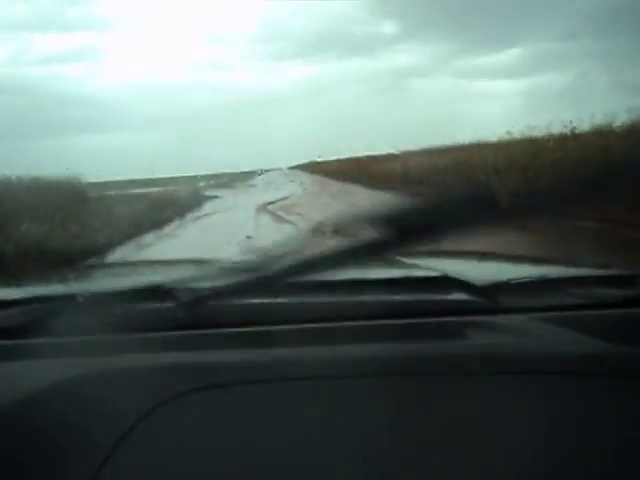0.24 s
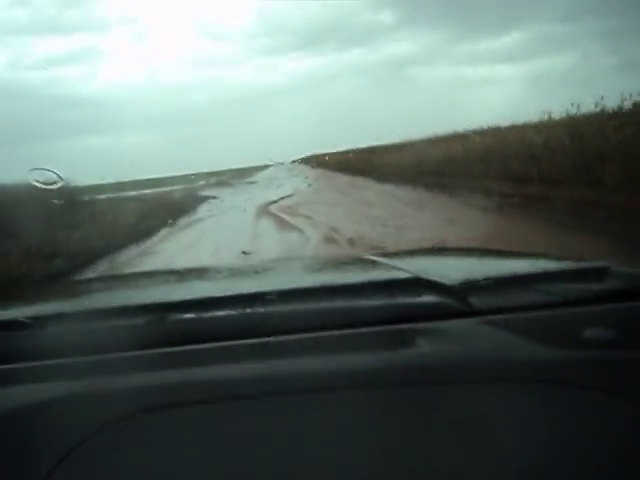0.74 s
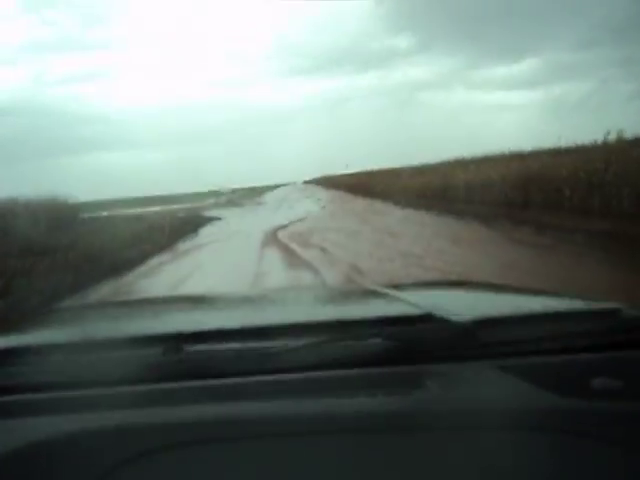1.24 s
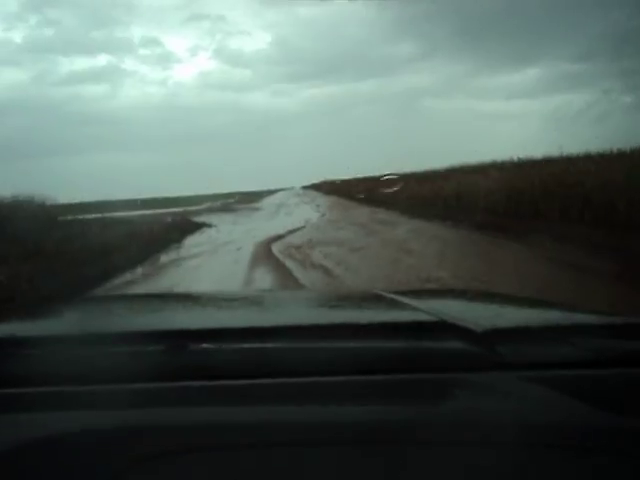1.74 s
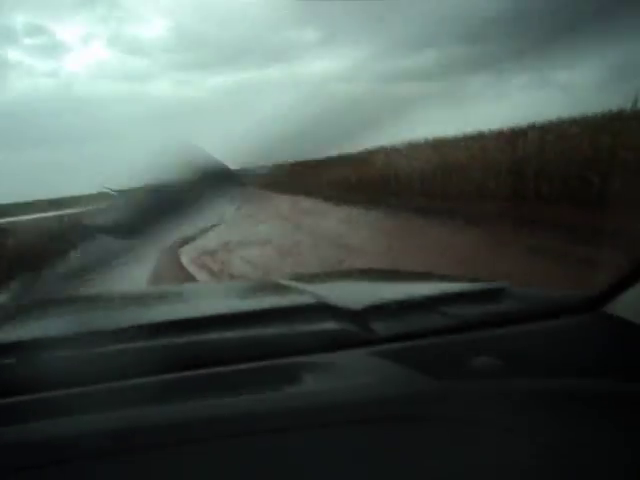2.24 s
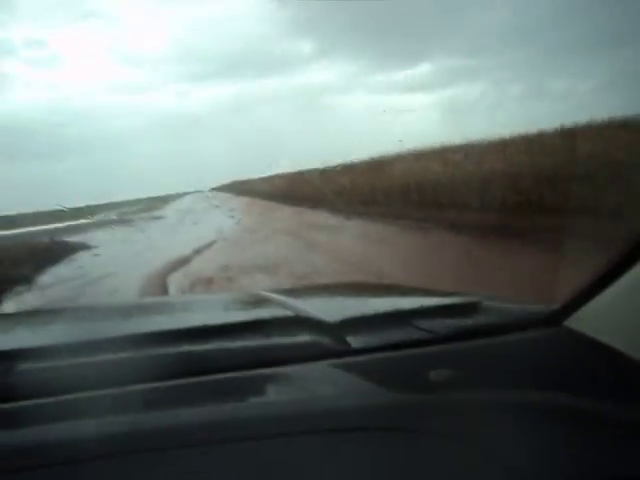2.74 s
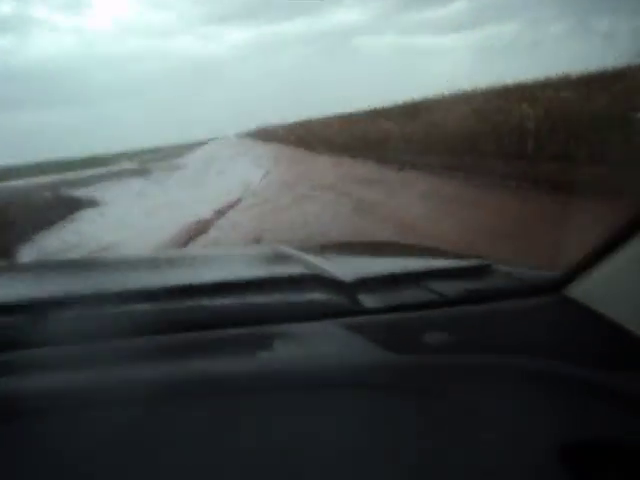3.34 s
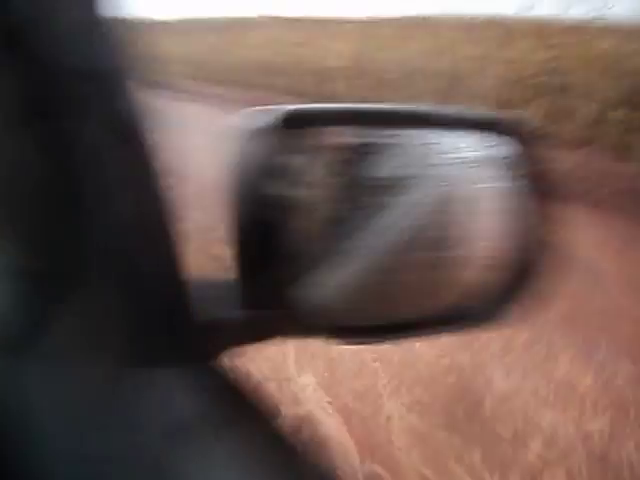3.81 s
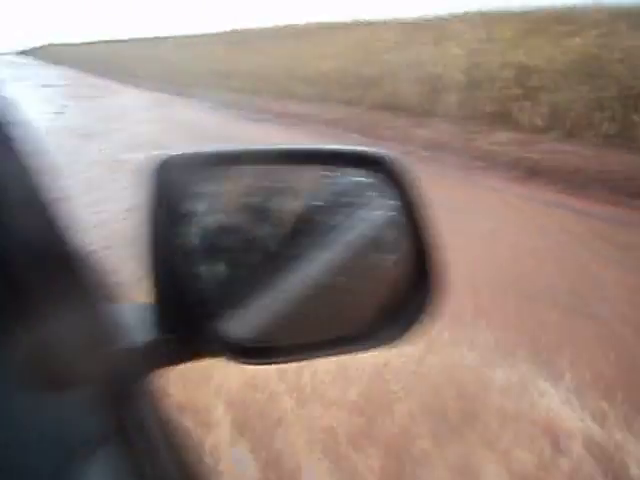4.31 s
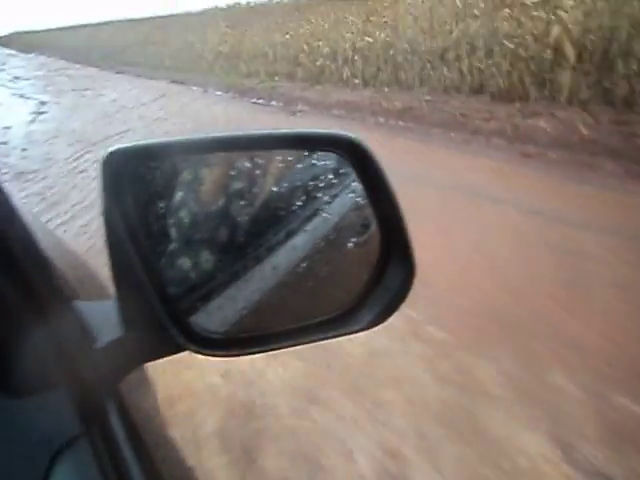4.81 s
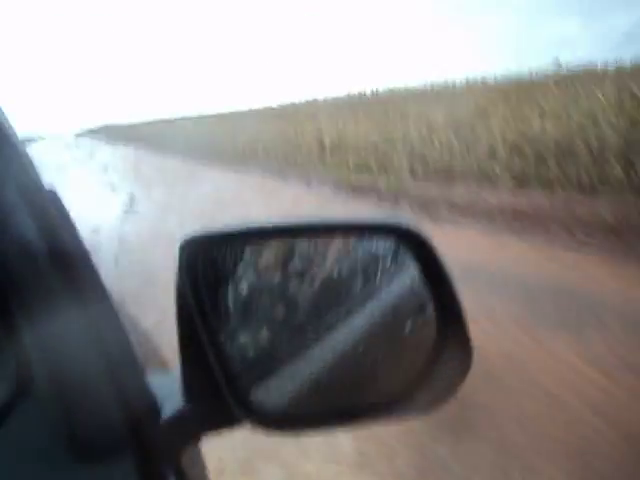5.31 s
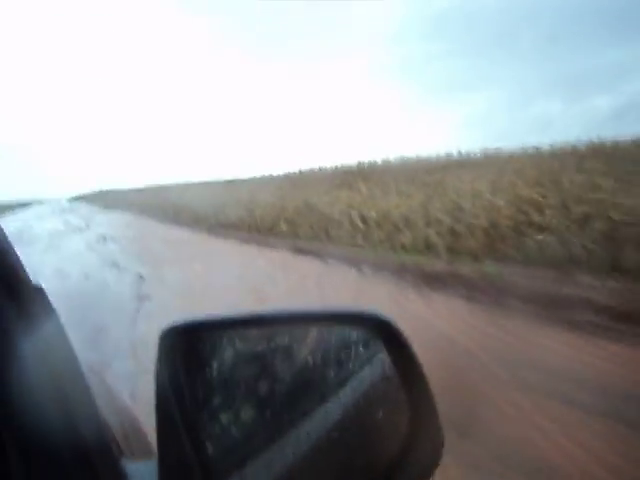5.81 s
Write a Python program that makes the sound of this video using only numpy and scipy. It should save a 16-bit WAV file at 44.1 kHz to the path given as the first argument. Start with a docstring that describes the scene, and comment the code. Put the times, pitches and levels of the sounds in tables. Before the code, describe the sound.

From 0 s, a close, muffled car interior: a low engine drone wavering around 40 Hz, floor boom and dull wash of road and water. At about 0.17, 1.34 and 2.53 s the wipers turn with a hard thud, a brief loose rattle and a second knock some 0.07 s later, then a short sinking motor whine and rubbery drag. Softer bumps mark the opposite turns near 0.7, 1.9 and 3.05 s. Small plastic clicks come at 1.7 and 2.3 s; strong ones at 3.17, 3.39 and, loudest, 3.69 s, over a weaker wiper turn, with the automatic level ducking afterwards. From 3 s spray fades in; by 4 s the cabin recedes behind fine droplet hiss and tyre splashing. A bright knock at 4.11 s, a soft thump at 4.43 s, then uneven low wind puffs buffet the microphone, thickest around 4.8-5.1 s and again near 5.9-6 s. Treble is limited, the sound mono and rough.

```python
"""Inside a car rolling slowly through flood water: wavering engine orders drone over shaped noise for the cabin
rumble and the muffled spray. Wipers thud at each turn as blows ring a panel; their joints rattle and motor whines.
A hand-held camera creaks as its shell rings, then swings to the open side window, where droplet noise hisses
and gusts of low noise buffet the microphone. Its gain control ducks everything after the sharpest ticks."""
import sys
import numpy as np
from scipy import signal
from scipy.io import wavfile
from scipy.ndimage import uniform_filter1d

SR = 44100
rng = np.random.default_rng(int(sys.argv[2]) if len(sys.argv) > 2 else 0)


def voltage_ratio(level):
    """Linear amplitude factor for a level in decibels (scalar or array-like)."""
    return 10 ** (np.asarray(level, float) / 20)


def master(y):
    """Save y as 16-bit WAV."""
    cut = np.clip(np.atleast_2d(y).T, -1, 1)
    pcm = np.round(cut * 32767)  # scale
    wavfile.write(sys.argv[1], SR, pcm.astype(np.int16))


N = 267244
T = np.arange(N) / SR

# Wiper cycles. Each row: time of the lower turn in seconds, strength in dB,
# slack in seconds until the arm catches.
SWEEPS = [(0.165, -1.5, 0.072), (1.344, -2, 0.068), (2.526, -2, 0.07), (3.704, -10, 0.067)]
# Modes of the panel under the screen. Each row: frequency in Hz, relative level in dB, nominal t60 in seconds.
COWL = [(83, -7, 0.23), (121.5, 2, 0.1), (156, -1, 0.061), (200.7, -3.5, 0.079), (268, -6.5, 0.081),
        (344, -1, 0.047), (455, -14.5, 0.15), (539, -10.5, 0.072), (660, -5, 0.067), (851, -17.5, 0.095),
        (973, -17, 0.041), (1076, -16.5, 0.026), (1380, -25.5, 0.0073), (2100, -20, 0.018),
        (2800, -21, 0.025), (3880, -23.5, 0.0094)]


def evened(x):
    """Scales to rms 1."""
    return x / np.sqrt(np.mean(x ** 2) + 1e-20)


def add(mix, s, sound):
    """Mixes a sound in at time s."""
    part = mix[round(s * SR):][:len(sound)]
    part += sound[:len(part)]


def band_passed(x, low_hz, high_hz):
    """Keeps what lies between two frequencies."""
    return signal.sosfilt(signal.butter(2, [low_hz, high_hz], "band", fs=SR, output="sos"), x)


def wander(hz):
    """Slow chance of rms 1, up to about hz."""
    low_pass = signal.butter(2, hz, fs=SR, output="sos")
    return evened(signal.sosfilt(low_pass, rng.standard_normal(N)))


def ring(hz, db, t60, rise):
    """One dying mode after a blow; rise is the time constant of its onset in seconds."""
    t = np.arange(SR // 4) / SR
    return voltage_ratio(db - 60 * t / t60) * (1 - np.exp(-t / rise)) * np.sin(2 * np.pi * hz * t)


def noise(spectrum, patchy_db, flicker_db, size):
    """Noise of rms 1 from random short-time spectra, with drifting patches and a flicker shared by all bands."""
    frames, bin_hz = 4 * N // size + 5, np.fft.rfftfreq(size, 1 / SR)
    real, imaginary, patches = rng.standard_normal((frames, len(bin_hz), 3)).T
    patches = uniform_filter1d(patches, size=size // 100, axis=0)
    patches = evened(uniform_filter1d(patches, size=8, axis=1))
    flicker = evened(uniform_filter1d(rng.standard_normal(frames), size=3))
    hz, db = np.transpose(spectrum)
    colour_db = np.interp(np.log(bin_hz + 1), np.log(hz + 1), db)[:, None]
    spectra = (real + 1j * imaginary) * voltage_ratio(colour_db + patchy_db * patches + flicker_db * flicker)
    return evened(signal.istft(spectra, nperseg=size, noverlap=3 * size // 4)[1][:N])


def car():
    """Engine orders waver in level over the boom of the floor and the wash of road and water."""
    # The car heard from the seat. Each row: time in seconds, engine drone level in dB, cabin wash level in dB.
    cabin = [(0, -35, -30.5), (0.797, -37, -29.5), (1.401, -37.5, -30), (1.947, -31.5, -29),
             (2.501, -44, -28.5), (3.1, -32, -28.5), (3.598, -37.5, -27.5), (4.002, -45, -41),
             (4.404, -39.5, -43), (6.1, -37, -29)]
    # Engine orders. Each row: multiple of the firing rate, relative level in dB.
    orders = [(1, 1), (2, -7.5), (3, -17.5), (5, -10.5)]
    # Road and water through the body. Each row: frequency in Hz, relative level in dB per Hz.
    wash_colour = [(88, -43.5), (150, -5), (189, 2.5), (269, -1.5), (324, -8), (667, -7), (840, -6),
                   (921, -12), (1460, -18.5), (2080, -14.5), (3790, -19.5), (5000, -27.5), (5920, -62),
                   (7700, -74), (13000, -120)]
    # Boom of the floor. Each row: frequency in Hz, relative level in dB per Hz.
    boom_colour = [(10, -16), (22, 6), (45, -6), (80, -1), (150, -13), (250, -30.5), (400, -40.5)]
    firing_hz, uneven = 38.47, 0.0501  # uneven: rms share by which the engine speed wavers

    s, drone_db, wash_db = np.transpose(cabin)
    drone_gain = np.sqrt(2) * voltage_ratio(np.interp(T, s, drone_db))
    wash_gain = voltage_ratio(np.interp(T, s, wash_db))

    turns = np.cumsum(firing_hz * (1 + uneven * wander(3.884))) / SR
    drone = np.zeros(N)
    for multiple, db in orders:
        drone += voltage_ratio(db + 1.5 * wander(2.2)) * np.sin(2 * np.pi * (multiple * turns + rng.random()))

    wash = noise(wash_colour, patchy_db=1.5, flicker_db=1.5, size=1024) * voltage_ratio(0.58 * wander(54) - 6.5)
    boom = noise(boom_colour, patchy_db=1.2, flicker_db=0.6, size=2048) * voltage_ratio(-4.5)
    return drone_gain * drone + wash_gain * (wash + boom)


def spray():
    """Dense hiss of droplets over lumpier splashing; both land in small uneven clumps."""
    # Water heard as the camera faces the window. Each row: time in seconds, fine spray level in dB,
    # splash level in dB.
    window = [(2.6, -68, -65), (3.099, -50.5, -51), (3.3, -44, -41.5), (3.618, -38.5, -30.5),
              (3.78, -40.5, -38.5), (4.12, -39.5, -33.5), (4.22, -36.5, -33), (4.35, -34.5, -32),
              (4.9, -31.5, -29.5), (5.5, -33.5, -31), (5.87, -31, -31.5), (6.06, -36.5, -37)]
    # Fine spray. Each row: frequency in Hz, relative level in dB per Hz.
    hiss_colour = [(1500, -38.5), (2150, -18.5), (2900, -7), (3350, 0), (3900, -1), (4400, -10.5),
                   (5050, -18.5), (5900, -18.5), (7700, -65), (13000, -115)]
    # Water thrown by the tyres. Each row: frequency in Hz, relative level in dB per Hz.
    splash_colour = [(150, -13.5), (300, -4), (650, -1), (950, -2), (1150, 0.5), (1800, -4.5), (2200, -7.5),
                     (3000, -12.5), (4500, -10.5), (5300, -23.5), (5900, -48.5), (7700, -86.5),
                     (13000, -120)]

    s, hiss_db, splash_db = np.transpose(window)
    hiss_gain = voltage_ratio(np.interp(T, s, hiss_db, left=-99))
    splash_gain = voltage_ratio(np.interp(T, s, splash_db, left=-99))
    clumps = voltage_ratio(0.57 * wander(200) + 1.08 * wander(9.6))
    hiss = noise(hiss_colour, patchy_db=1.3, flicker_db=0.55, size=1024)
    splash = noise(splash_colour, patchy_db=-0.4, flicker_db=0.0, size=1024)
    lumpy_splash = splash * voltage_ratio(1.3 * wander(60) + 1.0 * wander(10))
    return clumps * (hiss_gain * hiss + splash_gain * lumpy_splash)


def wind():
    """Lumpy low pressure swings that come in puffs; the small capsule rounds off the largest."""
    # Steady buffeting on the microphone. Each row: time in seconds, level in dB ahead of the capsule.
    steady = [(4.25, -29), (4.6, -28), (4.9, -22.5), (5.3, -26), (5.7, -22), (6.06, -22.5)]
    # Colour of the buffeting. Each row: frequency in Hz, relative level in dB per Hz.
    buffet_colour = [(10, -26.5), (22, -2), (38, -4.5), (60, -14.5), (120, -11.5), (300, -18), (800, -24),
                     (1500, -43.5), (3000, -71)]
    # Single puffs. Each row: time of the top in seconds, level in dB ahead of the capsule, half length in seconds.
    gusts = [(4.556, -26.5, 0.022), (4.776, -25, 0.028), (4.826, -20, 0.023), (4.903, -24, 0.016),
             (4.947, -21.5, 0.028), (5.032, -18, 0.007), (5.057, -20.5, 0.023), (5.186, -30, 0.041),
             (5.389, -21, 0.02), (5.505, -26, 0.017), (5.887, -20.5, 0.03), (5.959, -26, 0.011),
             (6.022, -18, 0.038)]
    # Coarse spray carried by the puffs. Each row: frequency in Hz, relative level in dB per Hz.
    coarse_colour = [(80, -27.5), (200, 2.5), (450, 0.5), (900, -10.5), (1500, -17.5), (3000, -31.5),
                     (6000, -62.5), (13000, -120)]
    dent_s = 0.005  # half width of the pressure dent

    lumps = evened(noise(buffet_colour, patchy_db=2, flicker_db=1.1, size=2048) * voltage_ratio(2.2 * wander(35)))
    level = voltage_ratio(np.interp(T, *np.transpose(steady), left=-99))
    puffs, dents = np.zeros(N), np.zeros(N)
    for s, db, half_s in gusts:
        puffs += voltage_ratio(db) * np.exp(-((T - s) / half_s) ** 2)
        # each puff dents the pressure once, as deep as its level
        u = (T - s) / dent_s
        dents += voltage_ratio(db) * (2 * u ** 2 - 1) * np.exp(-u ** 2)

    # each puff also carries a lump of coarse spray, which skips the rounding
    carried = voltage_ratio(-12) * puffs * noise(coarse_colour, patchy_db=-1.0, flicker_db=2.5, size=256)
    pressure = (level + puffs) * lumps + dents
    return 0.22 * np.tanh(pressure / 0.46) + carried


def knocks():
    """Blows ring panel modes, each a little differently, with a short gritty slap as of wet rubber."""
    # Blades flip at the lower turn. Each row: seconds after the turn, peak in dB over the strength of the
    # cycle, brightness in dB per octave.
    landing = [(-.007, -20, -2), (0, -8.5, 1.4), (.009, -15, 1.5), (.025, -16.5, -6.5), (.041, -23.5, 1)]
    # The linkage takes up its slack. Each row: seconds after the catch, peak in dB over the strength of the
    # cycle, brightness in dB per octave.
    catch = [(-.017, -21.5, 2), (-.008, -18, 1), (0, -10, -1.5), (.008, -14, -1.5), (.095, -20, -6)]
    # Upper wiper turns, a soft bump, a bright handling knock at 4.11 s and a puff-like thump at 4.43 s.
    # Each row: start in seconds, nominal peak in dB, brightness in dB per octave.
    turns_and_thumps = [(.692, -22, -1.5), (.71, -21, -7.5), (1.877, -18.5, -1), (1.891, -17.5, -8),
                        (1.914, -26, -4), (2.975, -27.5, -3), (3.051, -16.5, -5), (3.061, -20, -6),
                        (4.113, -19.5, 8), (4.425, -25, -3)]
    scatter_db, detune = 1.2, 0.025  # rms spread of the blows in level, and of their modes as a share of pitch
    slap_db, slap_t60_s, slap_bright_octaves = -28, 0.028, 2.4  # brighter blows slap louder

    blows = list(turns_and_thumps)
    for turn_s, strength_db, slack_s in SWEEPS:
        for start_s, hits in ((turn_s, landing), (turn_s + slack_s, catch)):
            blows += [(start_s + late_s, strength_db + db, bright_db) for late_s, db, bright_db in hits]

    out, slap_gain = np.zeros(N), np.zeros(N)
    slap_t = T[:SR // 10]
    for s, db, bright_db in blows:
        knock = 0
        for k, (hz, mode_db, t60) in enumerate(COWL):
            mode_hz = hz * (1 + detune * rng.standard_normal())
            tilted_db = mode_db + bright_db * np.log2(hz / 125)
            # modes start in opposite directions, pair by pair
            knock = knock + (-1) ** (k // 2) * ring(mode_hz, tilted_db, t60, rise=0.0013)
        hard_db = scatter_db * rng.standard_normal()
        add(out, s, voltage_ratio(db + hard_db) * knock / abs(knock).max())
        level_db = db + slap_db + slap_bright_octaves * min(bright_db, 5)
        add(slap_gain, s, voltage_ratio(level_db - 60 * slap_t / slap_t60_s))

    grit = evened(band_passed(rng.standard_normal(N), 1100, 4300))
    return out + slap_gain * grit


def panel_rattle():
    """Loose joints chatter unevenly and so excite the modes of the panel."""
    chatter = rng.standard_normal(N) * voltage_ratio(3.5 * wander(88))
    response = 0
    for hz, db, t60 in COWL:
        tilted_db = db + 3.5 * np.log2(min(hz, 900) / 125)
        response = response + ring(hz, tilted_db, 0.7 * t60, rise=0.001)
    return evened(signal.oaconvolve(chatter, response)[:N])


def wiper_drive():
    """The joints rattle from the lower turn to the catch; the motor whines and the blade drags in the pull."""
    # Motor whine. Each row: multiple of the motor pitch, relative level in dB.
    partials = [(1, 9), (2, -0.5), (3, -7.5)]
    rattle_db, rise_s, sag_db_per_s, fall_db_per_s = -21, 0.0097, 7.5, 299  # the fall follows the catch
    motor_hz, motor_sag_hz_per_s = 216, 250  # nominal pitch at full load, and how it sinks through the pull
    pull_db, pull_s, pull_half_s = -39, 0.15, 0.058  # load level, delay after the lower turn, half length
    scrape_db = -0.5  # the dragging blade's rattle, relative to the load

    shake, load = np.zeros(N), np.zeros(N)
    pitch_hz = np.full(N, float(motor_hz))
    for turn_s, strength_db, slack_s in SWEEPS:
        t = T - turn_s
        fade_db = sag_db_per_s * np.maximum(t, 0) + fall_db_per_s * np.maximum(t - slack_s, 0)
        shake += np.clip(t / rise_s, 0, 1) * voltage_ratio(rattle_db + strength_db - fade_db)
        load += voltage_ratio(pull_db + strength_db) * np.exp(-((t - pull_s) / pull_half_s) ** 4)
        sinking_hz = motor_hz - motor_sag_hz_per_s * np.clip(t - pull_s, -pull_s, pull_s)
        pitch_hz = np.where(t > 0, sinking_hz, pitch_hz)

    turns = np.cumsum(pitch_hz * (1 + 0.045 * wander(22))) / SR
    whine = np.zeros(N)
    for multiple, db in partials:
        whine += voltage_ratio(db + 2.8 * wander(25)) * np.sin(2 * np.pi * multiple * turns)
    return (shake + voltage_ratio(scrape_db) * load) * panel_rattle() + np.sqrt(2) * load * whine


def ticks():
    """Each snap rings the small camera shell; the grip picks which low modes sound and how much treble."""
    # Ticks of the shell. Each row: start in seconds, peak in dB, centre of the low ring in Hz, t60 in seconds,
    # treble in dB, frequency in Hz where front and back partly cancel.
    snaps = [(1.6886, -24.5, 1310, 0.016, 17, 2100), (1.7241, -11, 1320, 0.0071, -8, 2100),
             (1.7903, -31, 980, 0.036, 11, 2100), (2.289, -28, 1000, 0.024, 10, 2100),
             (3.168, -4.5, 755, 0.037, -2, 3530), (3.324, -22.5, 2050, 0.0038, -22, 2900),
             (3.39, -6.5, 1550, 0.0071, -1, 2950), (3.6934, 0, 1650, 0.02, 7, 3850)]
    # Modes of the shell. Each row: frequency in Hz, relative level in dB, share of the tick's t60.
    shell = [(630, 7, 0.59), (1020, 7, 0.69), (1460, -1, 0.99), (1707, 5, 0.5), (2470, 6.5, 0.1),
             (3023, 1.5, 0.34), (3688, 11, 0.19), (4840, 4.5, 0.071), (6060, -10.5, 0.13)]
    back_share = 0.62  # the back of the shell pulls while the front pushes

    out = np.zeros(N)
    for s, db, centre_hz, t60, treble_db, dip_hz in snaps:
        front = 0
        for k, (hz, mode_db, share) in enumerate(shell):
            weight = voltage_ratio(-16 * np.log2(hz / centre_hz) ** 2) + voltage_ratio(treble_db) * (hz > 2300)
            # above the lowest pair, neighbouring modes start in opposite directions
            sign = (-1) ** max(k, 1)
            front = front + sign * weight * ring(hz, mode_db, share * t60, rise=0.0006)
        t = T[:len(front)]
        back = np.interp(t - 1 / dip_hz, t, front)
        tick = front - back_share * back
        add(out, s, voltage_ratio(db) * tick / abs(tick).max())
    return out


def scene():
    """All sources at one microphone."""
    return (car() + spray() + wind() + knocks() + wiper_drive() + ticks())[None]


def top_cut(x):
    """Nothing passes above the cut-off."""
    return signal.sosfilt(signal.butter(12, 16600, fs=SR, output="sos"), x)


def record(dry):
    """Gain control, deaf to bass, drops just after a peak and creeps back; overloads clip; a narrow band."""
    threshold_db, recovery_db_per_s, delay_s = -11.0, 14, 0.0012
    sensed = band_passed(dry[0], 300, 6000)
    peak_db = 20 * np.log10(abs(sensed) + 1e-9)
    recovery_db = recovery_db_per_s * T
    held_db = np.maximum.accumulate(peak_db + recovery_db) - recovery_db
    over_db = np.maximum(held_db - threshold_db, 0)
    late_db = np.interp(T - delay_s, T, uniform_filter1d(over_db, size=30))
    amplified = np.clip(dry / voltage_ratio(late_db), -0.75, 0.75)
    voice_grade = signal.cheby2(14, 90, 7000, fs=SR, output="sos")  # 90 dB down from 7 kHz upwards
    band = signal.sosfilt(voice_grade, amplified)
    clipped = np.clip(band, -0.7, 0.7)
    return top_cut(clipped)


dry = scene()
out = record(dry)
master(out)
```